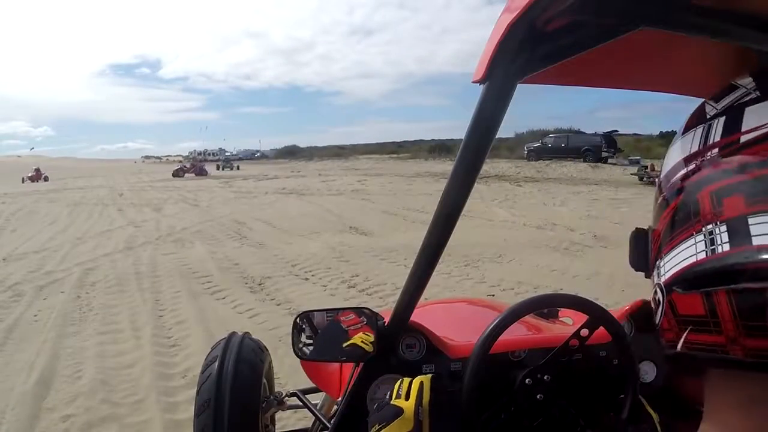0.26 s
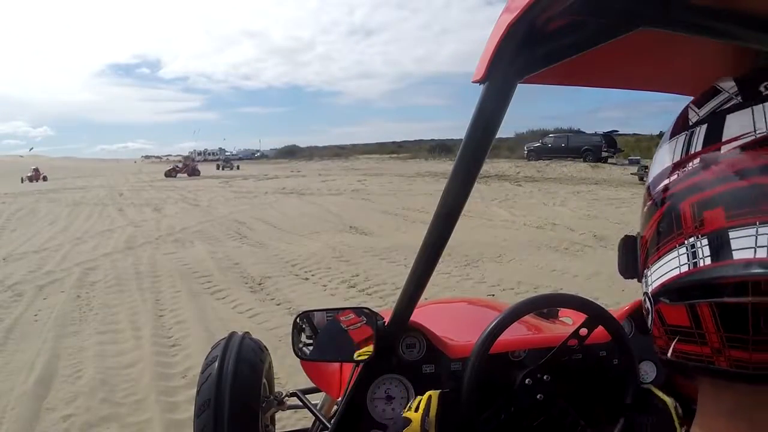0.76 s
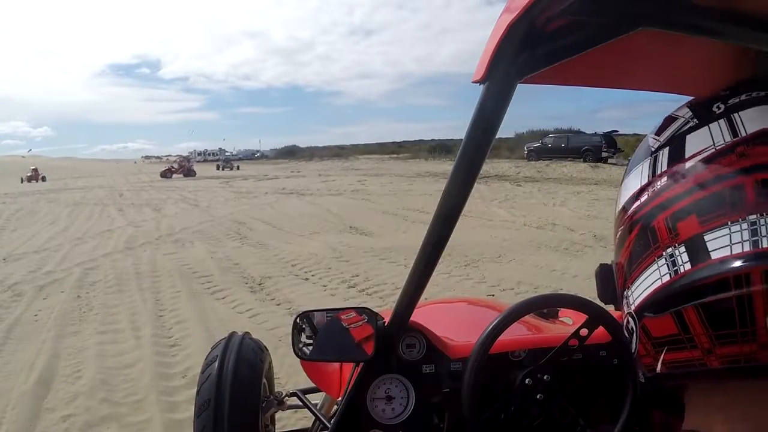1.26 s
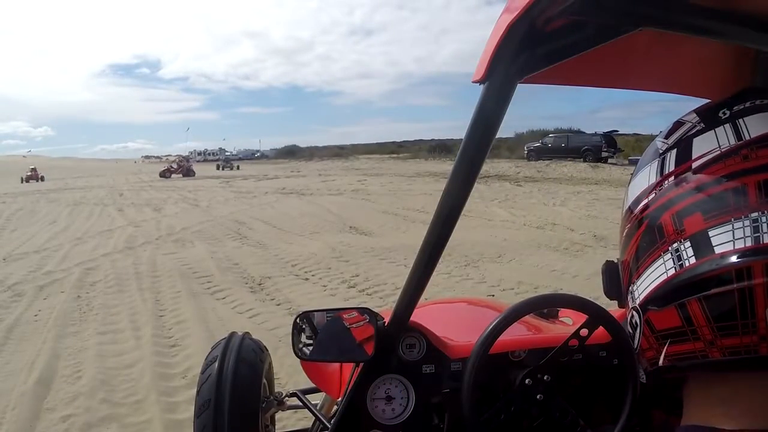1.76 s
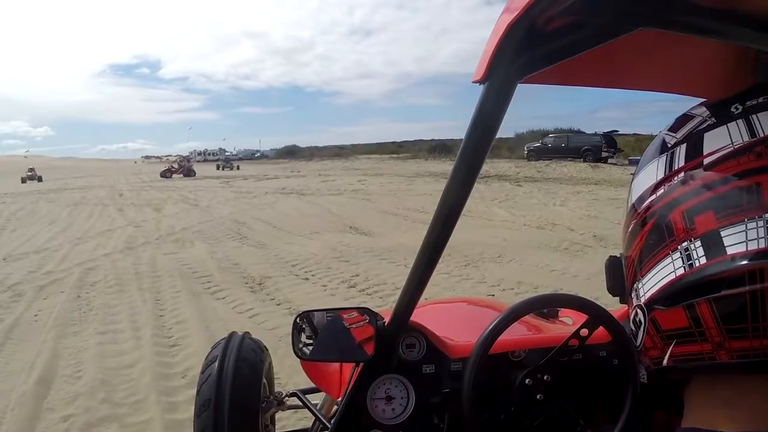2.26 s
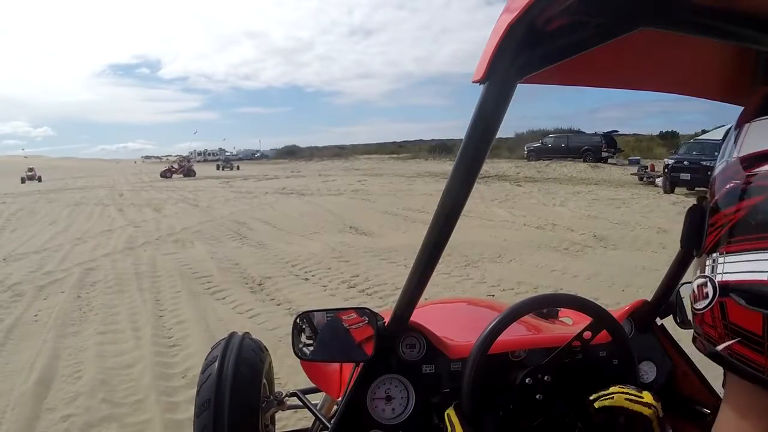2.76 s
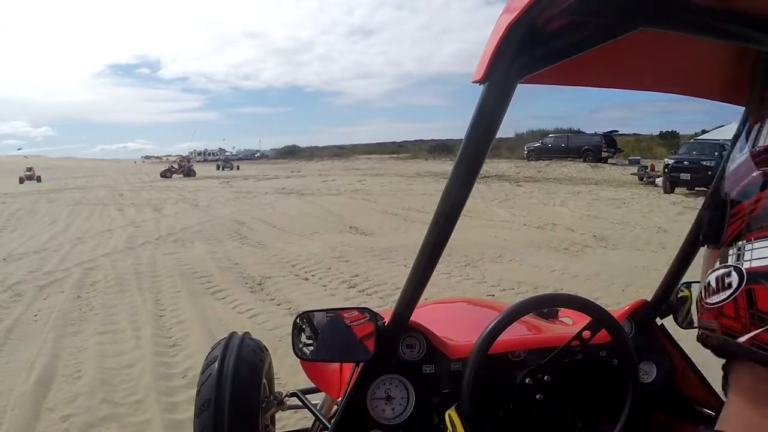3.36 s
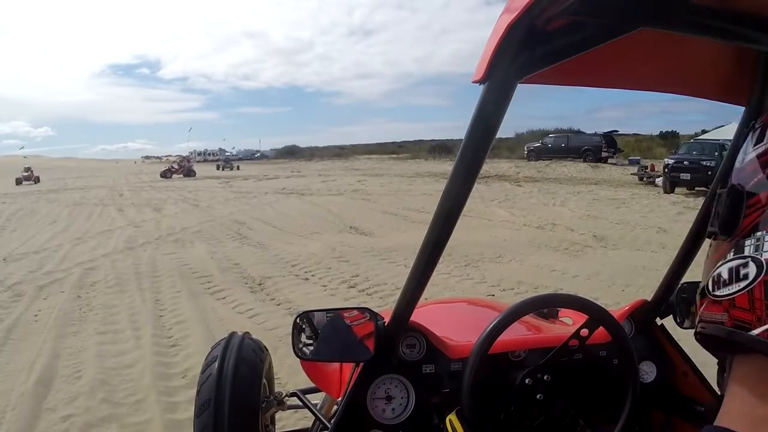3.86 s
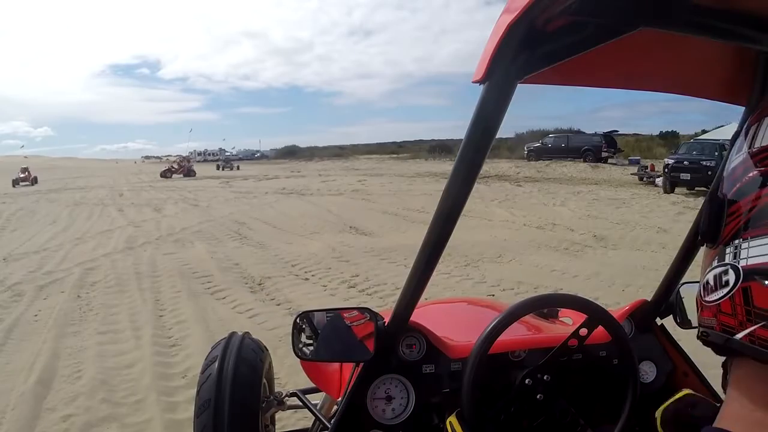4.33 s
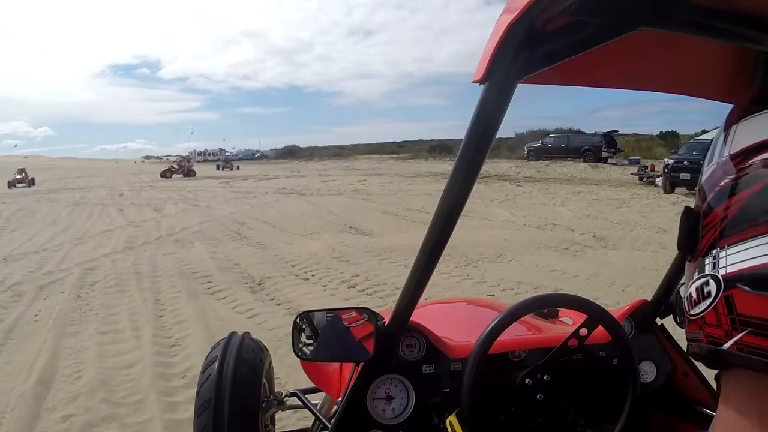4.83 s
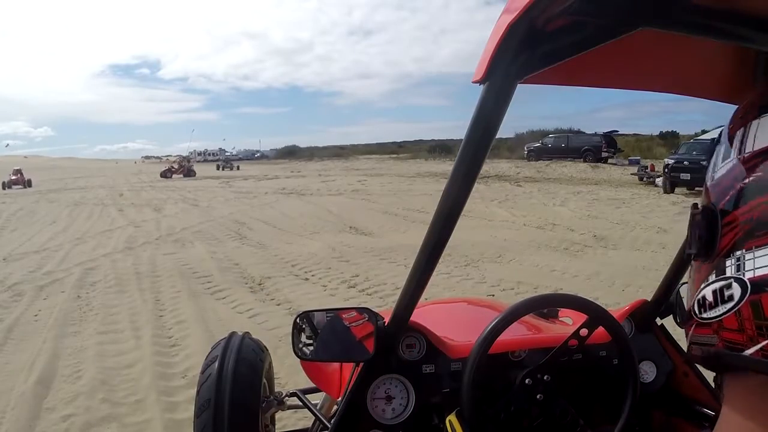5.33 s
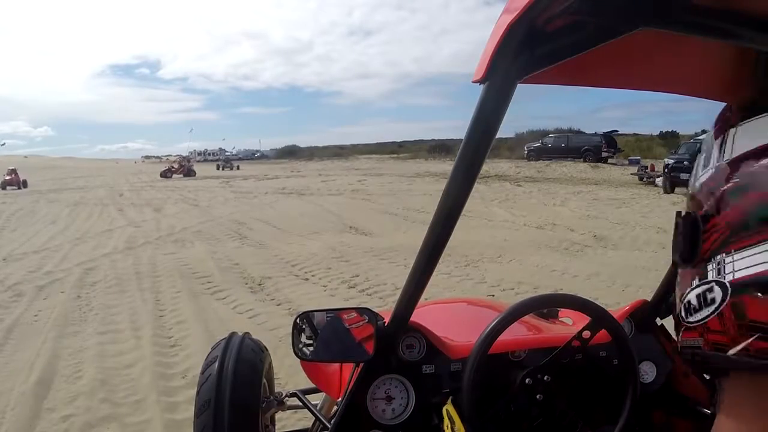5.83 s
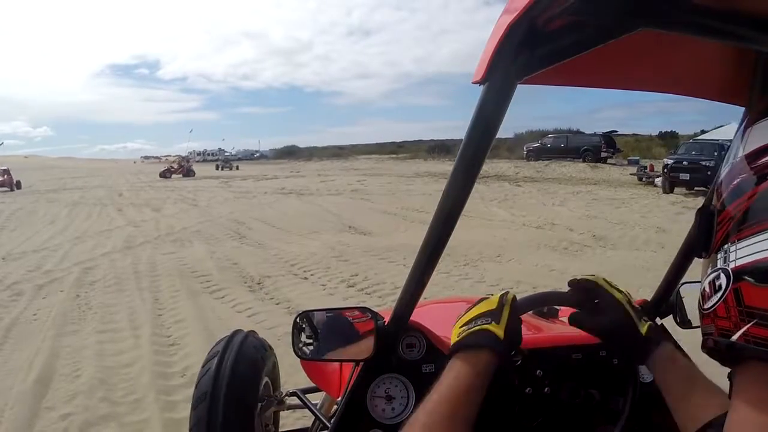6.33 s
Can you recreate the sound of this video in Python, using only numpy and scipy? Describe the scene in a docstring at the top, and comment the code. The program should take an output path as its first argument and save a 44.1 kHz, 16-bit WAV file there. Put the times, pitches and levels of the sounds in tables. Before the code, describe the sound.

A small dune buggy idles on open sand, heard close from inside its cage. The engine's low boom swells and fades as the idle wavers, under a steady metallic buzz of tubes and loose panels and some wind rumble. Loose parts knock now and then, and later one gives a hard clack. Near the end, gloves scrape briefly on the steering wheel and the throttle is blipped.

```python
"""A low boom swells and dies under a metallic buzz: a small buggy idles on open sand, heard from its cage.
The engine shakes the tube frame, and as the idle hunts, forced and free vibration beat against each other.
Valve gear, exhaust hiss and loose panels buzz through the resonances of cage and microphone housing.
Loose parts knock, once with a hard clack; at the end gloves scrape the wheel and the throttle is blipped."""
import sys
import numpy as np
from scipy import signal
from scipy.fft import rfft, irfft
from scipy.io import wavfile
from scipy.ndimage import uniform_filter1d

SR = 44100
rng = np.random.default_rng(int(sys.argv[2]) if len(sys.argv) > 2 else 0)


def waveform_to_disk(signal):
    """Save audio, clipped to [-1, 1], as 16-bit WAV at the path in sys.argv[1]."""
    frames = np.transpose(np.atleast_2d(signal))
    scaled = np.clip(frames, -1, 1) * 32767
    samples = np.round(scaled).astype(np.int16)
    wavfile.write(sys.argv[1], SR, samples)


N = 290619

# Hunting idle, then a blip of throttle: t/s, cycle rate/Hz, level/dB of the third-order shaking force
ENGINE_MOTION = [(0.0, 20.961, 21.4), (0.169, 20.441, 20.9), (0.317, 20.85, 18.3), (0.867, 20.699, 19.1),
                 (1.123, 20.367, 19.0), (1.478, 21.057, 17.5), (1.864, 20.799, 20.8), (2.097, 20.831, 20.0),
                 (2.178, 20.557, 19.5), (2.292, 21.753, 21.2), (2.557, 21.361, 21.2), (2.659, 20.707, 21.1),
                 (3.293, 20.713, 21.4), (3.319, 21.589, 20.2), (3.727, 20.853, 20.1), (3.968, 20.406, 19.3),
                 (4.281, 21.193, 18.9), (4.683, 21.344, 20.4), (4.877, 20.658, 21.1), (5.114, 20.052, 15.3),
                 (5.386, 21.012, 17.0), (5.992, 20.262, 18.8), (6.135, 20.904, 19.0), (6.212, 20.572, 20.6),
                 (6.226, 27.168, 16.0), (6.378, 27.819, 15.3), (6.423, 24.721, 11.0), (6.565, 27.04, 12.3)]
# Harmonics of the exhaust beat: multiple of the cycle rate, relative level/dB
EXHAUST_ORDERS = [(1, -5.5), (4, -11), (5, -18), (6, -17.5), (7, -23), (8, -23.5), (12, -27.5), (13, -31),
                  (14, -34.5)]
# Spectral density of wind and broad engine noise: f/Hz, relative level/dB
RUMBLE_SPECTRUM = [(20, 1.5), (35, 3), (75, -3), (130, -6.5), (220, -21), (380, -29), (1000, -18),
                   (2200, -26), (5000, -29.5), (8300, -44.5), (11000, -57.5)]
# Course of the buzz: t/s, metal level/dB, panel level/dB
BUZZ_LEVELS = [(0.0, -27.5, -30.5), (0.24, -30.5, -32.5), (0.51, -28, -29.5), (0.6, -31, -35.5),
               (0.83, -29.5, -32.5), (1.51, -32, -37), (1.52, -29.5, -31), (2.66, -27.5, -31.5),
               (2.9, -30, -32.5), (3.14, -28, -30.5), (3.4, -28.5, -33), (3.6, -27.5, -28.5),
               (4.2, -32, -36), (4.55, -27.5, -30), (4.72, -29, -32), (4.83, -26.5, -28.5),
               (4.88, -30, -31), (5.08, -32.5, -35.5), (5.82, -31.5, -34), (6.33, -33, -34.5),
               (6.37, -39.5, -42), (6.59, -32.5, -37)]
# Resonances of the loose panels: f/Hz, bandwidth/Hz, relative level/dB
PANEL_MODES = [(166, 53, -5), (248, 53.5, -3.5), (290, 22.3, 4), (467.8, 35.7, -0.5), (558, 113, -3.5),
               (648, 49.5, 0), (676, 26, 0), (749, 34.7, 1), (946.6, 25, -7)]
# Resonances of cage tubes, engine parts and tappets: f/Hz, bandwidth/Hz, relative level/dB
METAL_MODES = [(1210, 41, -11), (1387, 58, -5.5), (1561, 127, -1.5), (1670, 62, 0), (1801.3, 29.3, 2),
               (1982, 66, -11), (2070, 29, -11), (2360, 75, -12), (2630, 87, -5), (2873, 59, -4),
               (3206, 48, -13.5), (3433, 85, -10), (3686, 69, -9.5), (3966, 79, -15.5), (4200, 180, -20.5),
               (4460, 128, -13), (4798, 54, -12.5), (5390, 69, -24.5), (5850, 160, -24.5),
               (6283, 76, -18.5), (6880, 150, -32), (7550, 95, -26), (7940, 60, -29), (8250, 65, -44.5),
               (9005, 196, -25.5), (10360, 150, -39), (10230, 230, -36.5)]
# Blows of a loose part: t/s, level/dB of the excitation
KNOCK_BLOWS = [(0.470, 20), (1.162, 17.5), (1.615, 13), (1.869, 16), (2.114, 20.5), (2.173, 21.5),
               (2.246, 19), (3.127, 13), (3.25, 15), (4.505, 19.5)]
# Resonances of the hard clack: f/Hz, bandwidth/Hz, relative level/dB
CLACK_MODES = [(1000, 300, -10), (1210, 50, 0), (1620, 60, -1), (1850, 90, -5), (2660, 25, 1),
               (4500, 600, -17), (6000, 900, -28)]

IDLE_HZ = 20.7   # mean cycle rate at idle
FRAME_HZ, FRAME_WIDTH_HZ = 59.125, .229   # bending mode of the frame
PAN_HZ, PAN_WIDTH_HZ = 170.7, 7.7   # floor-pan resonance


def from_db(db):
    """Amplitude ratio of a level in dB."""
    return 10 ** (np.asarray(db) / 20)


def unit_rms(x):
    """Normalisation to rms 1."""
    return x / np.sqrt(np.mean(x ** 2) + 1e-20)


def in_time(rows):
    """Linear interpolation of a table's columns at every sample."""
    times, *columns = np.transpose(rows)
    return [np.interp(np.arange(N) / SR, times, column) for column in columns]


def drift(corner_hz):
    """Slow random fluctuation of rms 1: low-passed noise, drawn at every 40th sample."""
    r = np.exp(-2 * np.pi * corner_hz * 40 / SR)
    slow = signal.lfilter([1], [1, -2 * r, r * r], rng.standard_normal(N // 40 + 2002))[2000:]
    return np.interp(np.arange(N) / 40, np.arange(len(slow)), unit_rms(slow))


def pan_response(hz):
    """Resonance: the floor pan responds most at its natural frequency, here along a bell curve."""
    return np.exp(-((hz - PAN_HZ) / PAN_WIDTH_HZ) ** 2)


def exhaust(cycles, cycle_hz, beat_db, growl_db):
    """Periodic firing gives a harmonic series; resonance lifts any order that meets the floor pan."""
    out = 0
    for k, db in EXHAUST_ORDERS:
        wave = np.cos(2 * np.pi * k * cycles - .4 * (k - 2) ** 2)   # the pipe delays each order its own way
        lift_db = 5 * pan_response(k * cycle_hz) + 0.5 * growl_db * (k > 4)
        waver_db = 0.23 * k * drift(9.4)
        out += np.sqrt(2) * from_db(beat_db + db + lift_db + waver_db) * wave
    return out


def frame_boom(cycles, shake_db, surge):
    """Beats: engine orders two and three force a lightly damped mode that also rings freely."""
    second_order = from_db(4.39 + 1.57 * surge) * np.exp(4j * np.pi * cycles)
    force = -1j * from_db(shake_db) * (np.exp(6j * np.pi * cycles) + second_order)
    pole = np.exp((2j * np.pi * FRAME_HZ - np.pi * FRAME_WIDTH_HZ) / SR)
    frame = signal.lfilter([1 - abs(pole)], [1, -pole], force, zi=[.343j])[0]   # already ringing at t = 0
    # The third harmonic of the motion sounds when it meets the floor pan.
    power = np.abs(frame) ** 2
    instant_hz = np.gradient(np.unwrap(np.angle(frame))) * SR / (2 * np.pi)
    mean_hz = uniform_filter1d(power * instant_hz, size=4000) / uniform_filter1d(power, size=4000)
    third_harmonic = (frame ** 3 / (np.abs(frame) + 1e-9)).imag
    return frame.real + from_db(-24.5) * pan_response(3 * mean_hz) * third_harmonic


def rumble(metal_db, growl_db, level_db=-31, crossover_hz=230):
    """Modulated broadband noise of wind and engine: the bass follows the growl, the rest the buzz."""
    hz = np.fft.rfftfreq(N, 1 / SR) + 1
    points_hz, points_db = np.transpose(RUMBLE_SPECTRUM)
    spectrum = rfft(rng.standard_normal(N)) * from_db(np.interp(np.log(hz), np.log(points_hz), points_db))
    bass_share = 1 / (1 + (hz / crossover_hz) ** 4)
    low = from_db(1.2 * (growl_db - growl_db.mean())) * irfft(spectrum * bass_share, N)
    high = from_db(1.2 * (metal_db - metal_db.mean())) * irfft(spectrum * (1 - bass_share), N)
    return from_db(level_db) * unit_rms(low + high)


def contacts(per_s, spread_db, hiss):
    """Shot noise: dense random impacts of uneven size, over steady hiss."""
    sizes = from_db(spread_db * np.minimum(rng.exponential(1, N), 5)) * rng.choice([-1, 1], N)
    return unit_rms(sizes * (rng.random(N) < per_s / SR)) + hiss * rng.standard_normal(N)


def once_a_cycle(cycles, at, depth_db):
    """Amplitude modulation: a gain that peaks once in each engine cycle, by a new amount each time."""
    cycle_index = np.floor(cycles - at + .5).astype(int)
    strength = rng.uniform(.3, 1.7, int(N / SR * 30))[cycle_index]
    return from_db(depth_db * strength * np.cos(np.pi * (cycles - at)) ** 4)


def resonate(force, modes, waver_db):
    """Modal superposition: damped resonators of alternating sign, each wavering in strength on its own."""
    out = 0
    for k, (hz, width_hz, level_db) in enumerate(modes):
        r = np.exp(-np.pi * width_hz / SR)
        feedback = [1, -2 * r * np.cos(2 * np.pi * hz / SR), r * r]
        ringing = (1 - r * r) / 2 * signal.lfilter([1, 0, -1], feedback, force)
        out += (-1) ** k * from_db(level_db + waver_db * drift(6.4)) * ringing
    return out


def buzz(cycles, panels_db, metal_db):
    """Impact excitation: panels, tubes, engine parts and tappets chatter, hardest once in each cycle."""
    panels = contacts(per_s=550, spread_db=0.5, hiss=1.05) * once_a_cycle(cycles, at=0.68, depth_db=4.0)
    tubes = contacts(per_s=900, spread_db=1.0, hiss=1.26) * once_a_cycle(cycles, at=0.7, depth_db=2.0)
    parts = contacts(per_s=2500, spread_db=3.5, hiss=1.07) * once_a_cycle(cycles, at=0.68, depth_db=3.0)
    tappets = contacts(per_s=3000, spread_db=3.5, hiss=1.17) * once_a_cycle(cycles, at=0.88, depth_db=2.5)
    metal_ring = resonate(tubes, METAL_MODES[:7], waver_db=1.5)   # below 2.2 kHz
    metal_ring += resonate(parts, METAL_MODES[7:14], waver_db=1.0)
    metal_ring += resonate(tappets, METAL_MODES[14:], waver_db=0.73)   # above 4.1 kHz
    panel_ring = resonate(panels, PANEL_MODES, waver_db=0.5)
    return from_db(panels_db) * unit_rms(panel_ring) + from_db(metal_db) * unit_rms(metal_ring)


def blows(rows, t60_ms, bounces_per_s):
    """Rebound: each impulse is followed by random bounces that decay exponentially."""
    out, t = np.full(N, 1e-18), np.arange(4000) / SR
    for (start_s, db), chance in zip(rows, rng.random((len(rows), len(t)))):
        sizes = np.cos(1e6 * chance)   # random, between -1 and 1
        touches = (t == 0) + sizes * (chance < bounces_per_s / SR)
        out[round(start_s * SR):][:len(t)] += from_db(db - 60000 * t / t60_ms) * touches
    return out


def knocks():
    """Soft blows have a narrow force spectrum; with it a loose part rings the cage tubes."""
    band = signal.butter(2, [1400, 2000], "band", fs=SR, output="sos")
    force = signal.sosfilt(band, blows(KNOCK_BLOWS, t60_ms=60, bounces_per_s=320))
    return resonate(force, METAL_MODES, waver_db=5.5)


def clack(start_s=4.8125, blow_db=25):
    """A hard blow has a broad force spectrum; this one rings modes of its own."""
    force = blows([(start_s, blow_db)], t60_ms=40, bounces_per_s=1200)
    return resonate(force, CLACK_MODES, waver_db=0)


def gloves(start_s=6.19, rise_s=0.042, hold_s=0.062, fall_s=0.03, level_db=-42.5):
    """Friction noise: gloves slide briefly on the wheel in many tiny contacts."""
    band = signal.butter(2, [2300, 6000], "band", fs=SR, output="sos")
    scrape = signal.sosfilt(band, contacts(per_s=2600, spread_db=4.0, hiss=0.45))
    stroke = np.interp(np.arange(N) / SR, np.cumsum([start_s, rise_s, hold_s, fall_s]), [0, 1, 1, 0])
    return from_db(level_db) * stroke * unit_rms(scrape)


def scene():
    """Superposition: engine, frame, rattles and gloves add at one microphone."""
    cycle_hz, shake_db = in_time(ENGINE_MOTION)
    metal_db, panels_db = in_time(BUZZ_LEVELS)
    cycles = .207 + np.cumsum(cycle_hz) / SR
    surge = np.minimum(cycle_hz - IDLE_HZ, 1)   # Hz above idle, at most one
    metal_swing_db, shake_swing_db = metal_db - metal_db.mean(), shake_db - shake_db.mean()
    beat_db = -24 - 2.5 * surge + 0.78 * shake_swing_db
    growl_db = 5.5 * surge + 0.22 * metal_swing_db + 0.28 * shake_swing_db
    engine = exhaust(cycles, cycle_hz, beat_db, growl_db) + frame_boom(cycles, shake_db, surge)
    noise = rumble(metal_db, growl_db) + buzz(cycles, panels_db, metal_db)
    return (engine + noise + knocks() + clack() + gloves())[None]


def record(dry, microphone_hz=10800, whine_hz=13906, cutoff_hz=14700):
    """Band limiting and self-noise: the microphone dulls the top; electronics add hiss and a thin whine."""
    t = np.arange(N) / SR
    heard = signal.sosfilt(signal.butter(10, microphone_hz, fs=SR, output="sos"), dry)
    throb = 1 + .6 * np.cos(2 * np.pi * 60 * t)
    whine = from_db(-79 + 3 * drift(8)) * throb * np.sin(2 * np.pi * whine_hz * t)
    hiss = from_db(-68.5 + 1.5 * drift(12)) * rng.standard_normal(N)
    return signal.sosfilt(signal.cheby2(12, 30, cutoff_hz, fs=SR, output="sos"), heard + whine + hiss)


dry = scene()
out = record(dry)
waveform_to_disk(out)
```